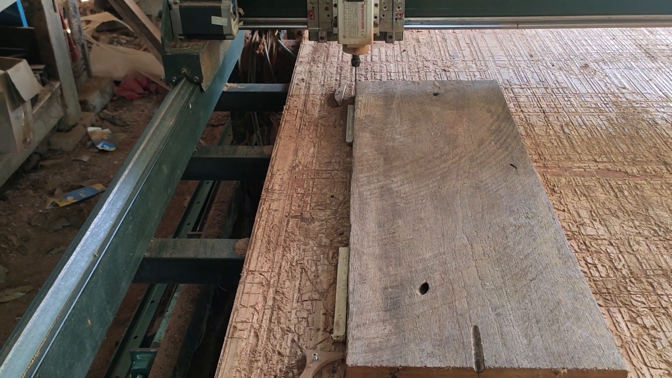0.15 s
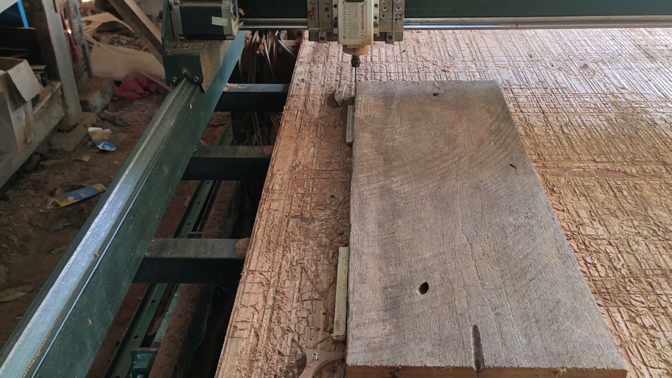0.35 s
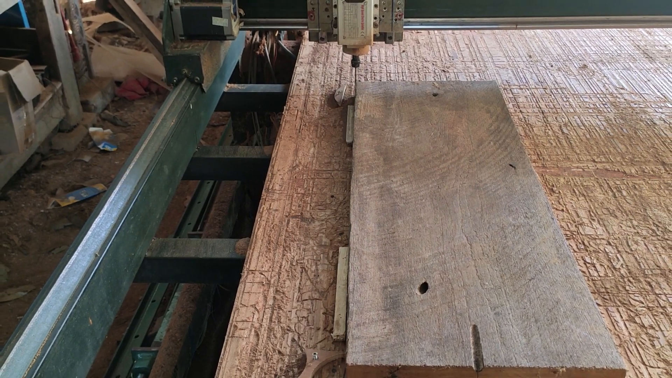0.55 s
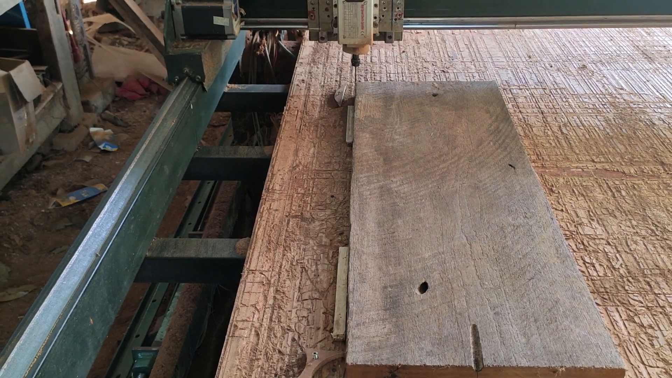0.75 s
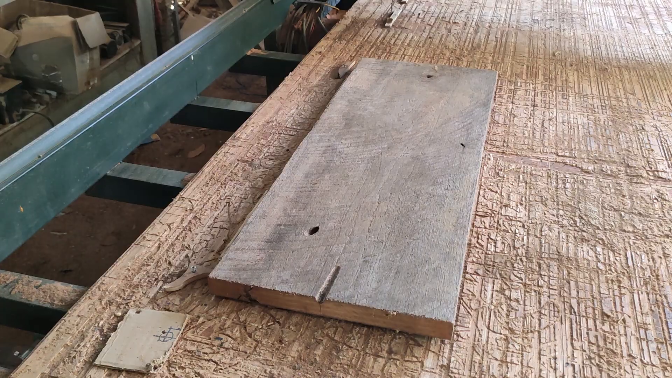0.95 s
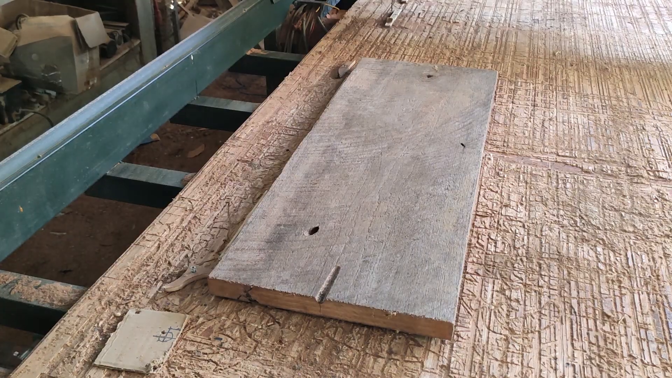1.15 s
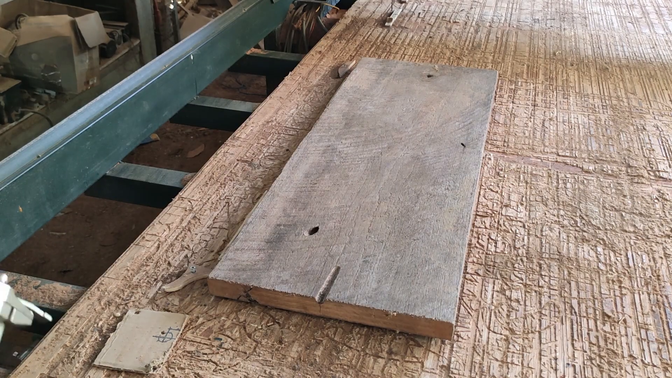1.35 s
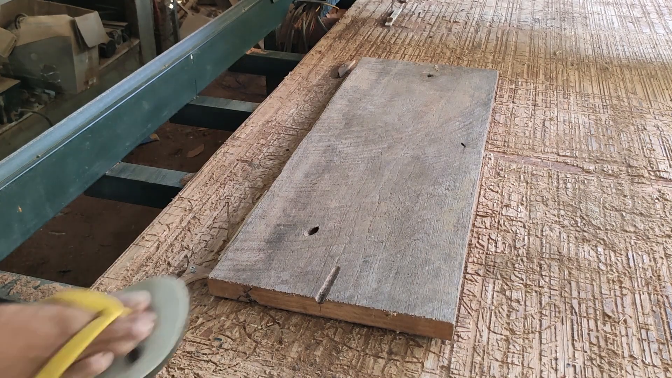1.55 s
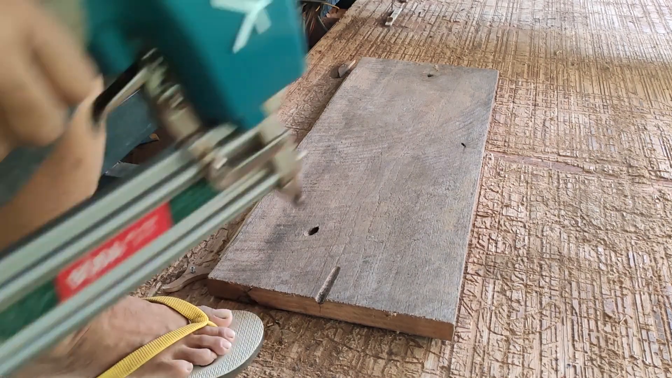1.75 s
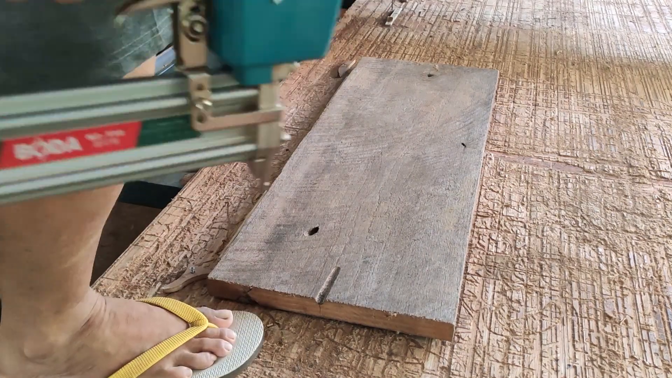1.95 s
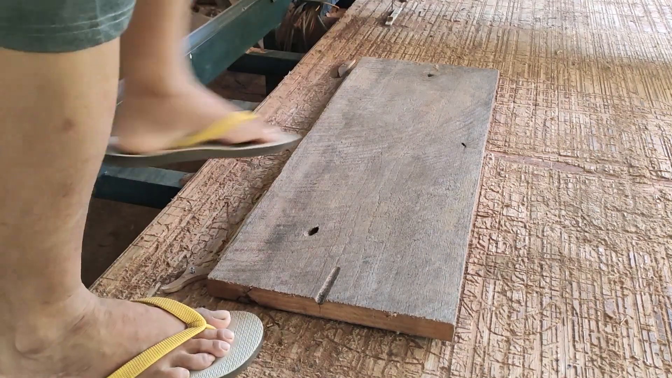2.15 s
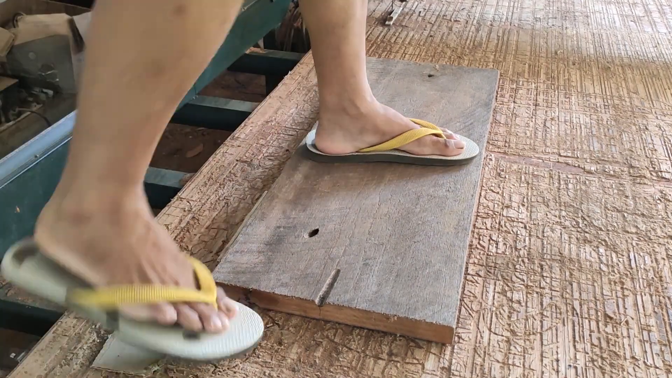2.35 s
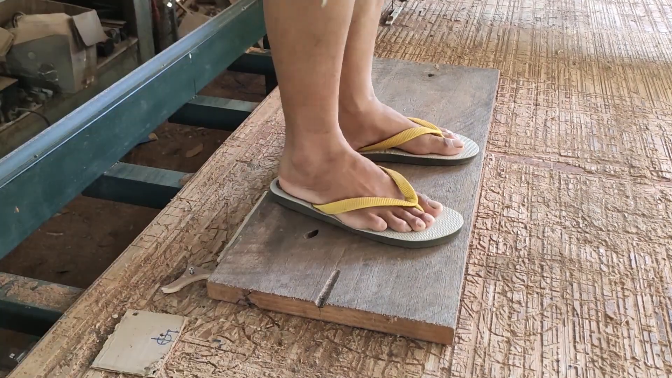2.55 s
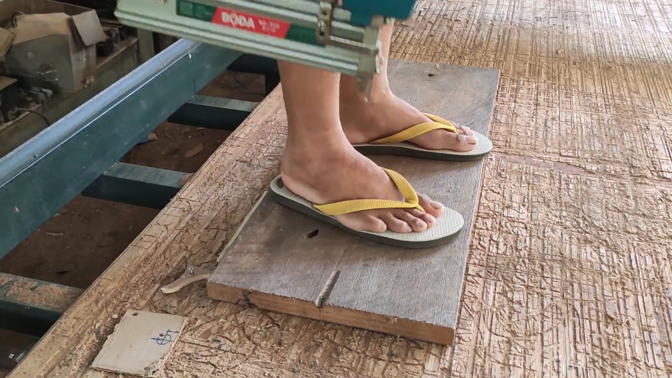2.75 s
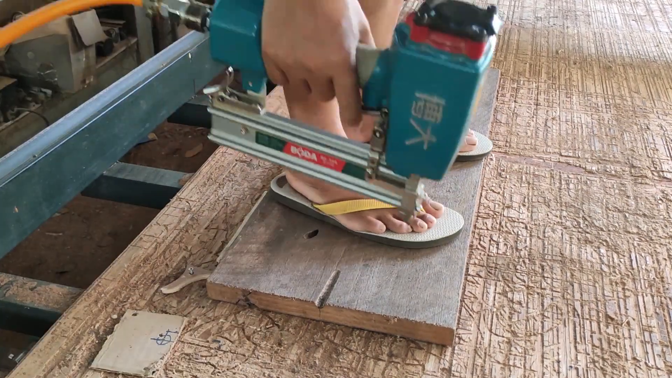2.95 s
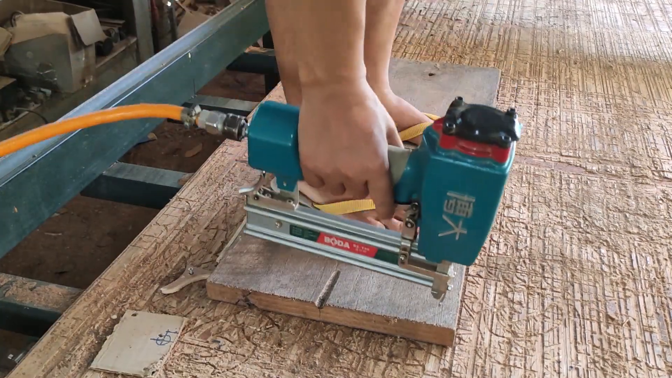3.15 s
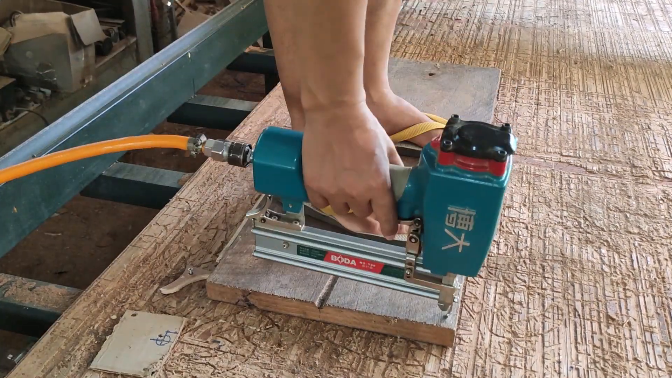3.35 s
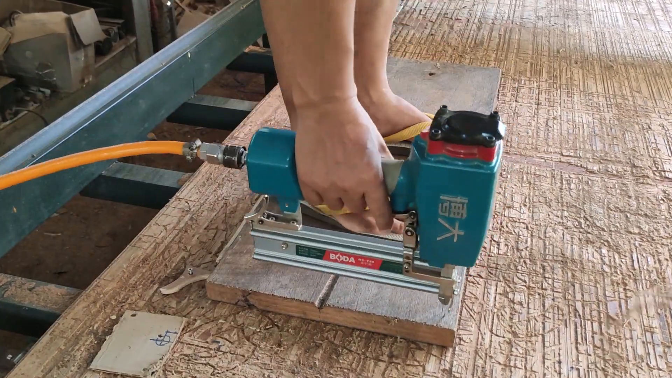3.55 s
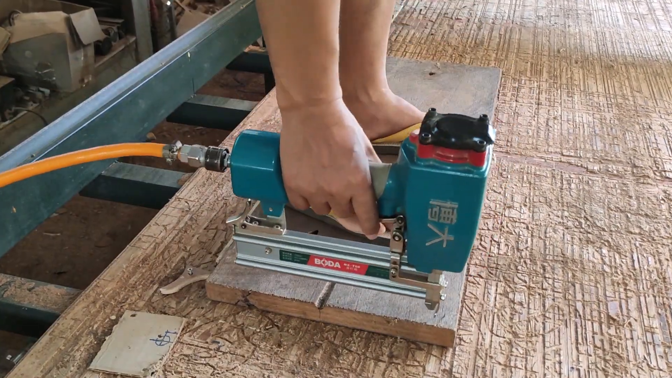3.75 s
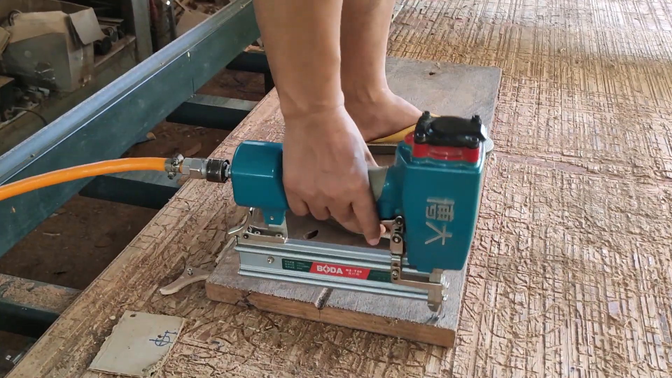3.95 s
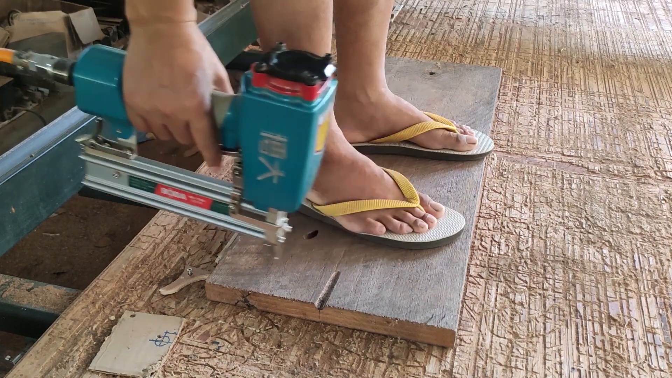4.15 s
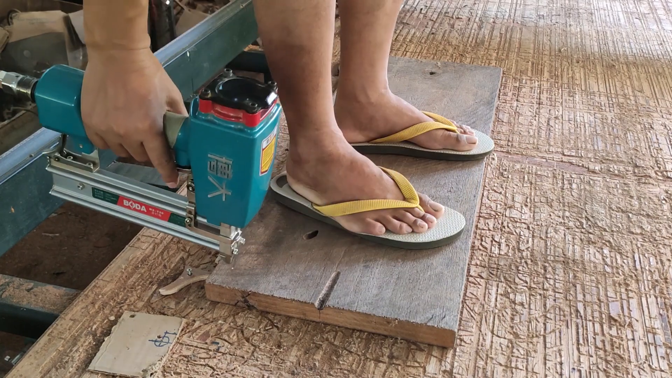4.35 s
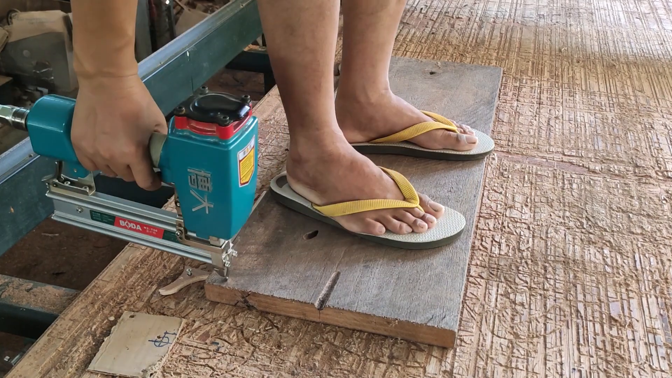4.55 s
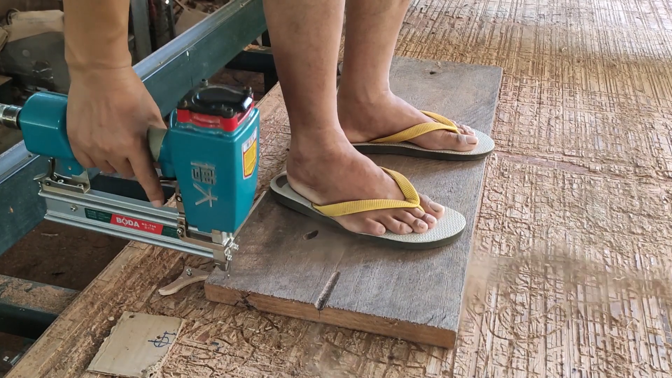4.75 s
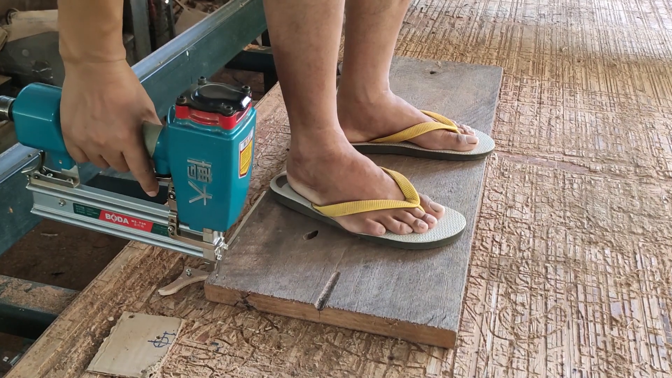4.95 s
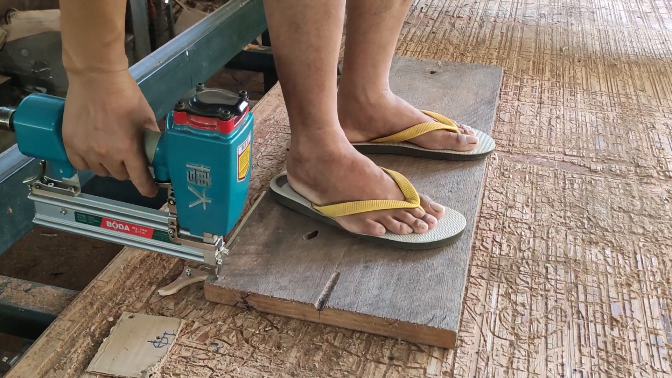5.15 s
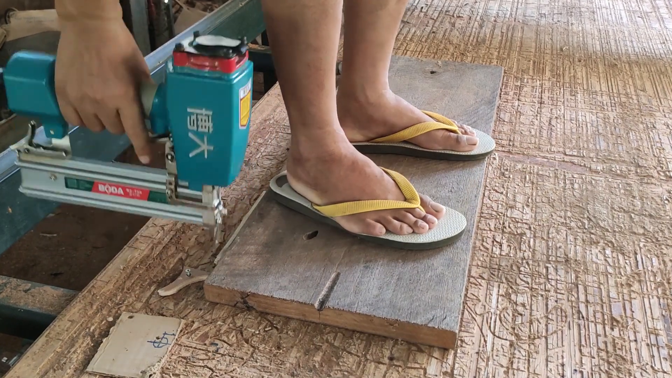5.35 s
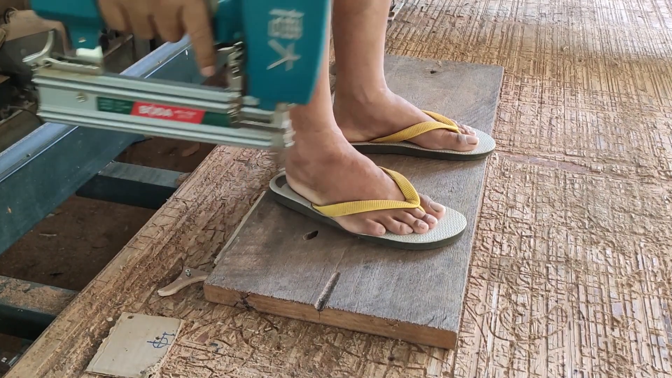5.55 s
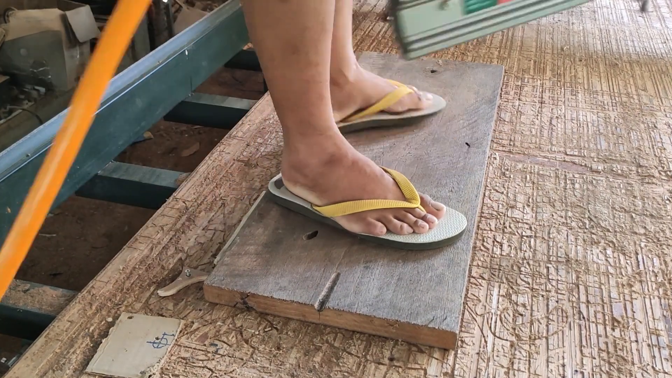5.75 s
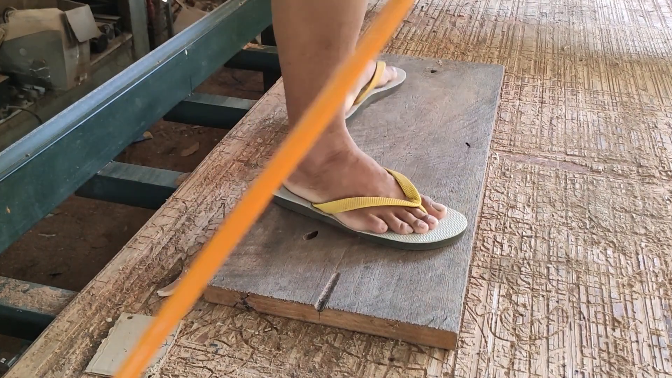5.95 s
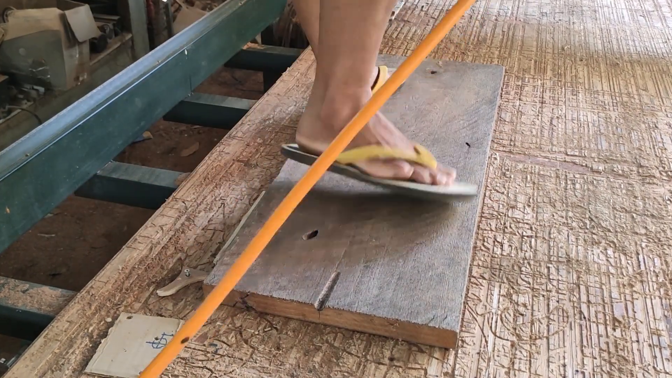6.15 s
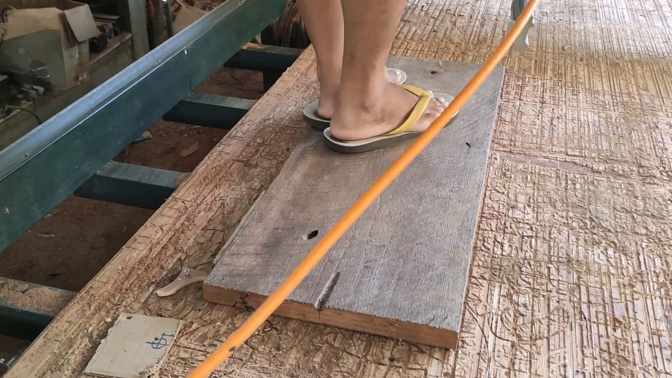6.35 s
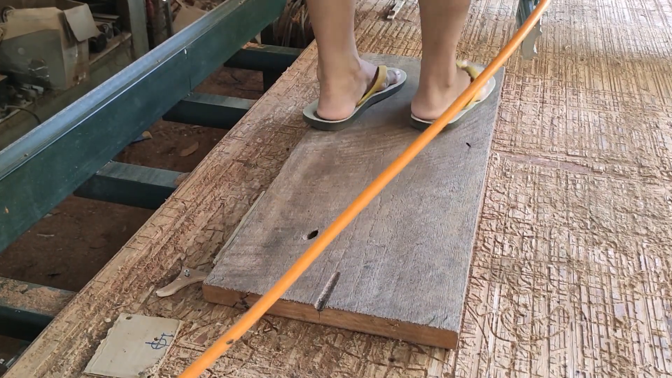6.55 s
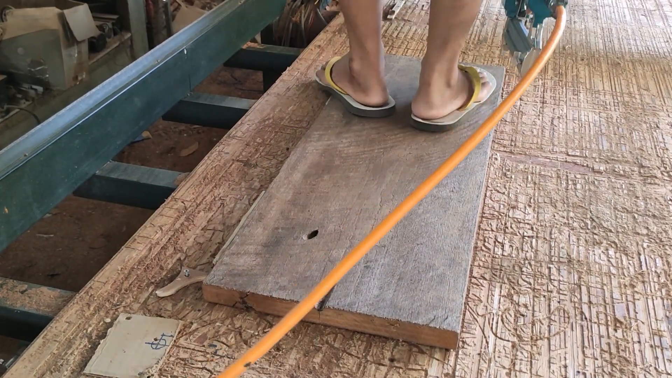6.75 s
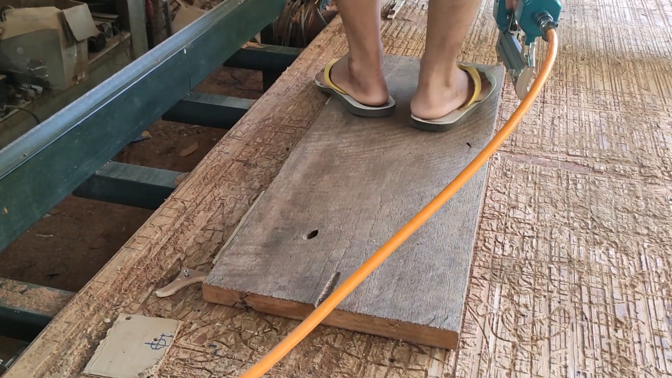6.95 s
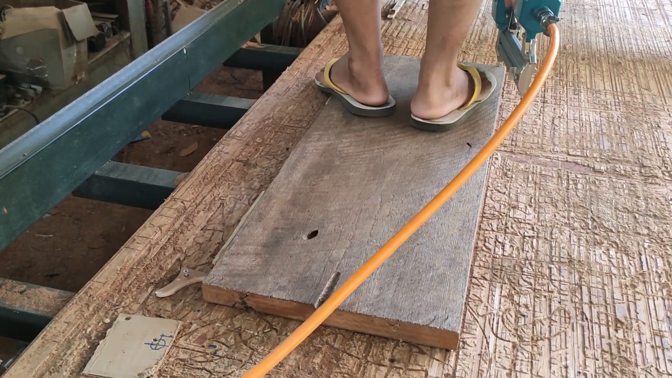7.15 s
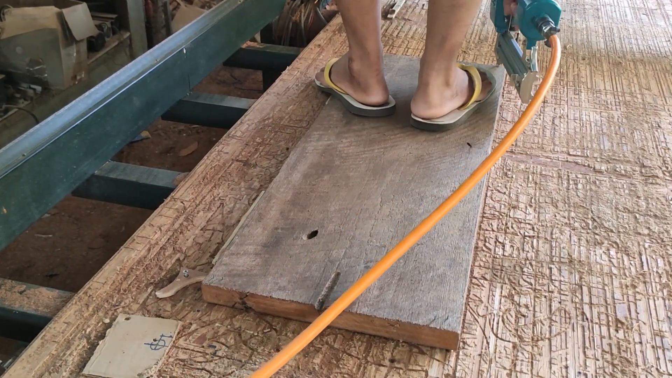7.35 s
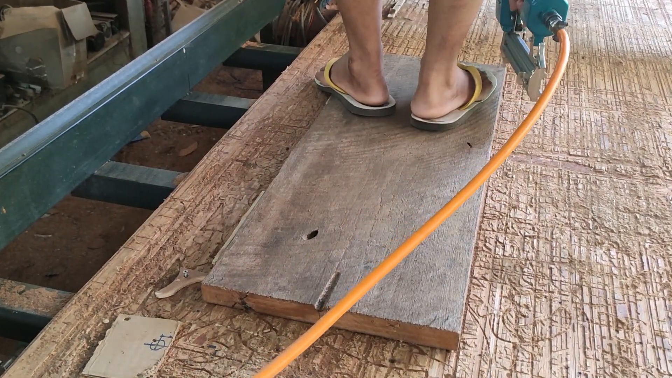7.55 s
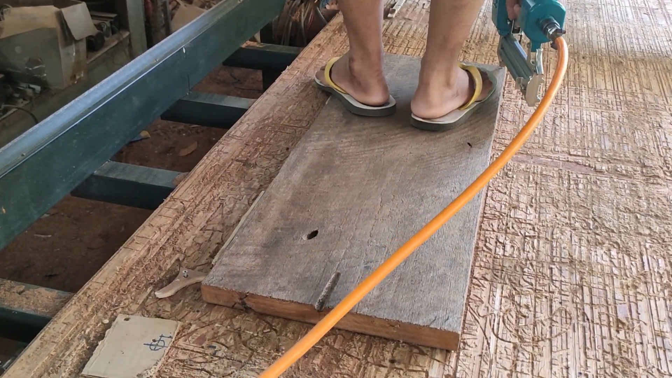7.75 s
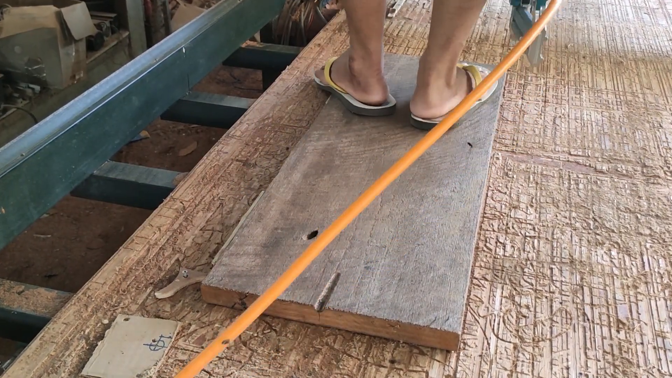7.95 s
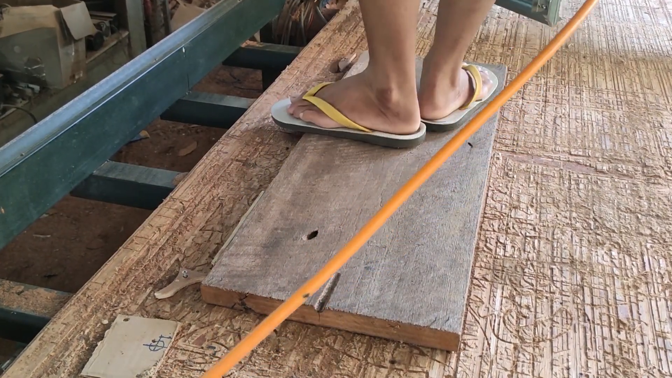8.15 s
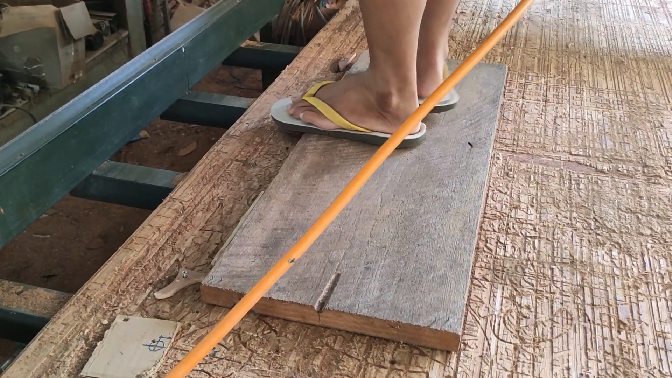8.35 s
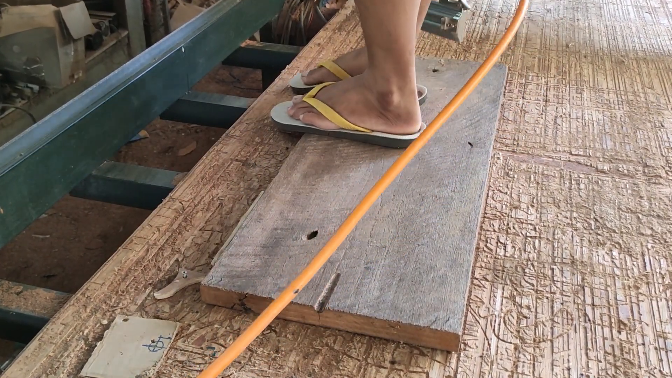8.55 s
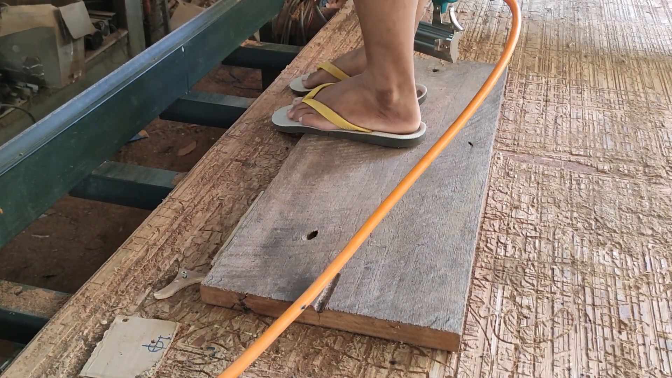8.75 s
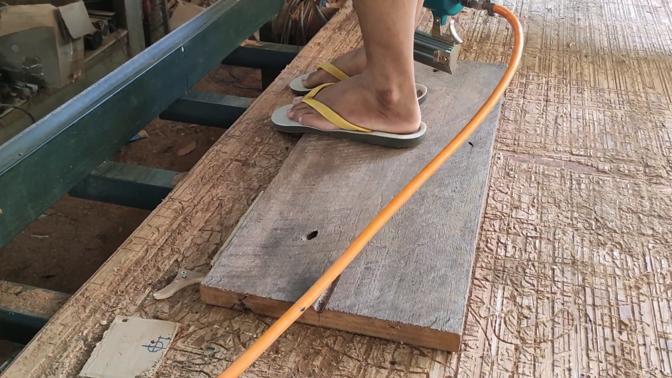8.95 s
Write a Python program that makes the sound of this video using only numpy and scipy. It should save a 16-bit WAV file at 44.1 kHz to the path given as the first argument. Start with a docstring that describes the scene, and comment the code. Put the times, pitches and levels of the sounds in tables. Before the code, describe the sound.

Quiet yard air with a faint falling whine and a dry trill of ticks cuts to a near machine, humming and knocking steadily. Sandals thud and slap onto a board. A nail gun fires four close, cracking shots with exhaust blasts, air buffeting the microphone. Feet scuff and squeak away, then two more shots strike farther along the board, and a last hiss begins. Open shed, close stereo microphone.

```python
"""Quiet yard sound comes first, with a faint falling whine and a dry trill of ticks: air noise, tones and short rings.
It gives way to a near machine that hums and knocks to the end: shaft multiples, motor tones and resonant noise.
Sandals thud, scuff and slap on a board: ringing wood modes, bursts of noise and sharp pressure swings.
A pneumatic nail gun drives six nails into it: valve hiss, driver blow and exhaust blast, all noise jets, cracks
and modes. Air from its blows and exhausts buffets the microphone, and the hiss of a seventh shot ends the scene."""
import sys
import numpy as np
from scipy import signal
from scipy.fft import rfft, irfft
from scipy.io import wavfile

SR = 44100
rng = np.random.default_rng(int(sys.argv[2]) if len(sys.argv) > 2 else 0)


def wav_record(signal):
    """Record a signal, one row per channel, as 16-bit PCM in the file named by sys.argv[1]."""
    frames = np.transpose(np.atleast_2d(signal))
    bounded = np.clip(frames, -1, 1)
    # unit amplitude maps onto the largest positive 16-bit level
    quanta = np.round(bounded * 32767).astype(np.int16)
    wavfile.write(sys.argv[1], SR, quanta)


N = 397782
T = np.arange(N) / SR
MACHINE_START_S = .835


def amp(db):
    """Decibels to gain."""
    return 10 ** (np.asarray(db) / 20)


def unit(x):
    """Scales to rms 1."""
    return x / np.sqrt(np.mean(x ** 2) + 1e-20)


def read(points, hz):
    """Reads a table along a log-frequency axis."""
    f, value = np.transpose(points)
    return np.interp(np.log(hz + 1), np.log(f + 1), value)


def add(mix, s, sound):
    """Adds a sound into the mix from time s, cut at the end of the scene."""
    part = mix[:, round(s * SR):][:, :sound.shape[-1]]
    part += sound[..., :part.shape[1]]


def drift(rate_hz):
    """Slow random wandering of rms 1, with little movement above rate_hz."""
    coarse = T[::32]
    hz = np.fft.rfftfreq(len(coarse), coarse[1])
    low_pass = 1 / (1 + (hz / rate_hz) ** 4)
    slow = irfft(rfft(rng.standard_normal(len(coarse))) * low_pass, len(coarse))
    return np.interp(T, coarse, unit(slow))


def noise(spectrum, alike, size):
    """Coloured noise of rms 1 at two microphone ports, as alike in each band as the table says."""
    hz = np.fft.rfftfreq(size, 1 / SR)
    a, b = rfft(rng.standard_normal((2, size)))
    same = np.clip(read(alike, hz), -1, 1)
    ports = np.array([a, same * a + np.sqrt(1 - same ** 2) * b])
    return unit(irfft(ports * amp(read(spectrum, hz)), size))


def narrow(hz, width_hz):
    """Turbulence in one resonance, at half gain width_hz to either side of its centre."""
    f = np.fft.rfftfreq(N, 1 / SR)
    resonance = 1 / (1 + ((f - hz) / width_hz) ** 2)
    return unit(irfft(rfft(rng.standard_normal((2, N))) * resonance, N))


def die_away(x, t60):
    """Lets every band decay at its own speed."""
    hz, t, z = signal.stft(x, SR, nperseg=128)
    decay = amp(-60 * t / read(t60, hz)[:, None])
    return signal.istft(z * decay, SR, nperseg=128)[1][:, :x.shape[1]]


def tones(table, waver=0.2):
    """Steady motor tones whose phase wavers (radians rms) at each port."""
    out = np.zeros((2, N))
    for hz, db in table:
        wander = waver * np.array([drift(2.5), drift(1.6)])
        out += amp(db) * np.sqrt(2) * np.sin(2 * np.pi * hz * T + wander)
    return out


# spectrum of the yard's air: f/Hz, level/dB per Hz (relative)
YARD_SPECTRUM = [(24, -43), (40, -23), (124, -26.5), (178, -16), (284, -16.5), (421, -13), (487, 1.5),
                 (758, -12), (899, -11.5), (992, -16.5), (1430, -20.5), (1830, -18), (2230, -22),
                 (5000, -26), (14000, -45)]
# left-right likeness of distant sound, also for the machine: f/Hz, likeness (0-1)
FAR_LIKENESS = [(60, 1), (290, 0.88), (640, 0.55), (1410, 0.41), (3100, 0.18), (16000, 0)]
# steady tones of far machinery: f/Hz, level/dB
FAR_TONES = [(183, -69), (366.1, -64.5), (489.9, -59), (899, -65)]


def yard():
    """Far machinery, a faint falling whine and a trill, before the near machine is heard."""
    swell_db = 2.7 * np.clip(T / .5, 0, 1) - 3.0
    air = amp(-50) * noise(YARD_SPECTRUM, FAR_LIKENESS, N) * amp(drift(3.3) + swell_db)
    fade_out = np.clip((MACHINE_START_S - .005 - T) / 0.014, 0, 1)
    return (air + tones(FAR_TONES) + whine() + trill()) * fade_out


# path of a faint far whine: t/s, f/Hz, level/dB
WHINE_PATH = [(.33, 1190, -83), (.39, 1160, -55), (.5, 1122, -50), (.58, 1124, -50), (.68, 1054, -69)]


def whine():
    """A falling tone with two overtones, unsteady in pitch and level."""
    s, hz, db = np.transpose(WHINE_PATH)
    pitch_hz = np.interp(T, s, hz) * (1 + 0.0063 * drift(60))
    phase = 2 * np.pi * np.cumsum(pitch_hz) / SR
    level_db = np.interp(T, s, db, -120, -120) + 2.7 * drift(37)
    second = 0.21 * np.sin(2 * phase + 0.77 * drift(120))
    third = 0.14 * np.sin(3 * phase + drift(120))
    return amp(level_db) * (np.sin(phase) + second + third)


# a dry trill of ticks: t/s, rate/ticks per s, level/dB
TRILL_PATH = [(.51, 35, -52), (.57, 55, -48), (0.608, 112, -45), (.66, 120, -45), (.73, 110, -45),
              (0.821, 127, -44)]
# each tick rings with: f/Hz, level/dB, decay time constant/s
TICK_RINGS = [(5670, -1, 0.0012), (6300, 3, 0.00054), (8760, -9, 0.00061), (11600, -9, 0.00062)]


def trill():
    """Thin ticks that speed up to a nearly even train, each a few short high rings."""
    s, rate, db = np.transpose(TRILL_PATH)
    count = np.floor(np.cumsum(np.interp(T, s, rate, 0, 0)) / SR + .5)
    ticks = np.diff(count, prepend=0) * amp(np.interp(T, s, db) + 1.6 * rng.standard_normal(N))
    t = T[:400]
    ring = sum(amp(db) * np.exp(-t / decay) * np.sin(2 * np.pi * hz * t) for hz, db, decay in TICK_RINGS)
    ring = ring * np.minimum(t / 0.00047, 1)
    return signal.oaconvolve(ticks, ring)[:N]


# spectrum of the machine's rush of air: f/Hz, level/dB per Hz (relative)
RUSH_SPECTRUM = [(20, -15), (60, -32), (150, -9.5), (300, -11), (550, -7.5), (800, -6.5), (1010, 10.5),
                 (1200, 1.5), (1450, -0.5), (1900, 6), (2600, -10), (5000, -11), (11500, -14),
                 (13200, -10.5), (16000, -32)]
# resonances in that rush: f/Hz, half-width/Hz, level/dB
AIR_WHISTLES = [(1017, 32, -61.5), (3003, 23, -59.5), (3670, 30, -60.5), (8340, 490, -58)]
# other motors: f/Hz, level/dB
MOTOR_TONES = [(91.5, -64), (237, -71.5), (280, -72), (327, -63.5), (489.9, -65.5), (1814, -58),
               (8460, -84)]
MACHINE_FADE_S, PORT_LAG_SAMPLES = 0.096, 8  # the machine reaches the left port later


def machine():
    """The knocking shaft, other motors and whistling air, all a little to the right."""
    rush = amp(-45.5) * noise(RUSH_SPECTRUM, FAR_LIKENESS, N) * amp(.5 * drift(1.1))
    for hz, width, db in AIR_WHISTLES:
        rush += amp(db + 0.72 * drift(17)) * narrow(hz, width)
    left, right = knocking() + rush + tones(MOTOR_TONES)
    fade_in = np.clip((T - MACHINE_START_S) / MACHINE_FADE_S, 0, 1)
    return np.array([np.roll(left, PORT_LAG_SAMPLES), right]) * fade_in


# machine shaft: t/s, speed/turns per s
SHAFT_SPEED = [(0, 46.9), (1.5, 46.92), (3.4, 46.97), (5.6, 47.05), (6.3, 47.08), (9.02, 47.05)]
# buzz of the machine's casing: f/Hz, level/dB per Hz (relative)
BUZZ_SPECTRUM = [(40, -5), (500, -28), (1300, -18), (2300, 10), (2700, 3), (3200, -1), (3900, 0),
                 (6000, -8.5), (9000, -2), (16000, -3)]


def knocking():
    """Two light knocks and a hard one in every turn of the shaft make a comb of lines that throbs."""
    light, spacing_turns = .6, .255  # a light knock's strength against the hard one, and the gap
    scatter, waver_db = .22, 1.1  # phase scatter in radians
    speed = np.interp(T, *np.transpose(SHAFT_SPEED))
    turns = np.cumsum(speed * (1 + .0003 * drift(3))) / SR
    angle = 2 * np.pi * np.arange(2048) / 2048
    groups = np.zeros((5, 2, 2048))
    for k in range(7, 67):  # multiples of the shaft speed
        early = np.exp(2j * np.pi * k * spacing_turns)
        # the knocks stay crisp where the casing rings; reflections smear the other lines
        smear = scatter * (1 + ((k - 42) / 7) ** 2)
        phase = np.angle(1 + light * (early + early ** 2))
        phase = phase + smear * rng.standard_normal() + scatter * rng.standard_normal((2, 1))
        groups[k % len(groups)] += casing_gain(k, speed.mean()) * np.cos(k * angle + phase)
    # each group of lines swells and sinks on its own
    hum = sum(amp(waver_db * drift(10.0)) * each_turn(lines, turns) for lines in groups)
    # the casing buzzes with the same faint pattern on every turn
    buzz = each_turn(noise(BUZZ_SPECTRUM, FAR_LIKENESS, size=937), turns)
    return amp(3.5) * hum + amp(-49.0) * buzz


# resonances of the machine's casing, rung by the knocks: f/Hz, half-width/Hz, level/dB (relative)
CASING_MODES = [(446, 90, -59), (705, 29, -57.5), (1313, 30, -52), (1645, 22, -56), (1824, 25, -50.5),
                (1950, 220, -53.5), (2000, 96, -53), (2210, 28, -55.5), (3020, 34, -59)]


def casing_gain(k, shaft_hz):
    """Strength of the k-th multiple of the shaft speed, as the casing passes it; even ones are weaker."""
    hz, width, db = np.transpose(CASING_MODES)
    passed = amp(db) / (1 + ((k * shaft_hz - hz) / width) ** 2)
    return np.linalg.norm(passed) * amp(-4.5 * (k % 2 == 0))


def each_turn(shape, turns):
    """Repeats a two-port pattern once in every turn of the shaft."""
    return np.array([np.interp(turns, np.arange(len(p)) / len(p), p, period=1) for p in shape])


# sandals set down on the board: t/s, thud level/dB, scuff level/dB
FOOTSTEPS = [(1.727, -45, -63), (2.076, -66, -39.5), (2.299, -27, -39), (2.54, -44, -44), (2.759, -23, -50),
             (6.058, -45, -49), (6.601, -40, -47), (6.798, -42, -52), (6.91, -39, -48), (8.87, -44, -47.5)]
# a sole slapping down flat: t/s, slap level/dB, level of the knock in the board/dB
SOLE_SLAPS = [(2.3091, -9.5, -34), (2.541, -28, -58), (6.607, -24, -40), (6.797, -33, -50),
              (6.915, -27, -47)]
# dull answer to a foot: f/Hz, level/dB per Hz (relative)
THUMP_SPECTRUM = [(30, -50), (90, 2), (170, 1.5), (300, 12.5), (600, 7.5), (2000, -41), (16000, -80)]
# sole dragged over wood: f/Hz, level/dB per Hz (relative)
SCUFF_SPECTRUM = [(200, -39), (900, -5), (1450, 8), (2600, 3.5), (4000, -0.5), (6300, -1.5), (8000, -8),
                  (16000, -18)]
# a firm step's scuff; a lighter foot drags for longer
SCUFF_S, FIRM_STEP_DB, DRAG_DOUBLES_DB = 0.0098, -25, 18.5


def sandals():
    """A sole thuds on the board, scuffs the wood and may slap down flat; once it squeaks as it turns."""
    out = np.zeros((2, N))
    for s, thud_db, scuff_db in FOOTSTEPS:
        length = SCUFF_S * 2 ** ((FIRM_STEP_DB - thud_db) / DRAG_DOUBLES_DB)
        thump = amp(-11.5) * jet(THUMP_SPECTRUM, rise=0.0048, hold=0.014, t60=0.19)
        add(out, s, amp(thud_db) * (board(soft_hz=605) + thump))
        add(out, s, amp(scuff_db) * jet(SCUFF_SPECTRUM, length / 2, length, t60=0.16))
    for s, slap_db, knock_db in SOLE_SLAPS:
        add(out, s, amp(slap_db) * crack(hz=1780, width=0.00035))
        add(out, s, amp(knock_db) * board(soft_hz=2400))
    squeak = np.interp(T, [6.06, 6.075, 6.15], [0, 1, 0])
    return out + amp(-49) * squeak * narrow(hz=4240, width_hz=39)


# modes of the board with a nail driven in: f/Hz, level/dB, t60/s
BOARD_MODES = [(294, -18, 0.12), (406, -5, 0.11), (472, -17, 0.26), (588, -11.5, 0.16), (672, -7, 0.082),
               (811, 2.5, 0.041), (1027, 4.5, 0.03), (1194, 3.5, 0.046), (1758, -4, 0.067),
               (2373, -3, 0.11), (2850, -6.5, 0.14), (3145, 2, 0.049)]


def board(soft_hz, size=12000):
    """The board's ringing modes; a soft blow excites mostly those under soft_hz."""
    t = T[:size]
    hz, db, t60 = np.transpose(BOARD_MODES)[..., None]
    phase = rng.uniform(0, 2 * np.pi, hz.shape) + rng.standard_normal((2, len(hz), 1)) * hz / 1800
    softness = 1 / (1 + (hz / soft_hz) ** 4)
    modes = amp(db - 60 * t / t60) * softness * np.sin(2 * np.pi * hz * t + phase)
    return modes.sum(1) * np.minimum(t / 0.00089, 1)


# left-right likeness of near sound: f/Hz, likeness (0-1)
NEAR_LIKENESS = [(60, 0.65), (400, 0.99), (1400, 0.54), (3000, 0.38), (7000, 0.042), (16000, 0.053)]
# jets lean slightly right in the lows and left in the highest treble: f/Hz, left minus right level/dB
JET_TILT = [(200, -2.5), (4400, -0.5), (8000, -1), (13000, 4), (16000, 0)]


def jet(spectrum, rise, hold, t60, size=12000):
    """A burst of air: it opens, holds, and dies away among near surfaces (times in s)."""
    t = T[:size]
    side_db = read(JET_TILT, np.fft.rfftfreq(size, 1 / SR))
    port_gains = amp(np.array([side_db, -side_db]) / 2)
    air = irfft(rfft(noise(spectrum, NEAR_LIKENESS, size)) * port_gains, size)
    return air * np.minimum(t / rise, 1) * amp(-60 * np.maximum(t - hold, 0) / t60)


def crack(hz, width, size=600):
    """One sharp pressure swing, a cycle or two long, from a source too small to radiate bass."""
    t = T[:size] - 2 * width
    swing = np.cos(2 * np.pi * hz * t) * np.exp(-abs(t / width) ** 1.14)
    return signal.sosfilt(signal.butter(2, 200, "high", fs=SR, output="sos"), swing)


# air through the trigger valve, also colours the nose's click: f/Hz, level/dB per Hz (relative)
VALVE_SPECTRUM = [(240, -41), (400, -8.5), (1330, -13.5), (1560, -9), (1840, -17), (2430, -12),
                  (3810, -7.5), (4110, -8), (7280, -2), (10700, -3), (12900, 2.5), (15000, -1),
                  (16000, -27)]


def nose_tap(click_db, ring_db):
    """The steel nose touches the board: a tiny burst of noise and a soft ring of the wood."""
    click = jet(VALVE_SPECTRUM, rise=0.0011, hold=0.0021, t60=0.059)
    return amp(click_db) * click + amp(ring_db) * board(soft_hz=900)


# the gun's nose set on the board: t/s, click level/dB, board ring level/dB
NOSE_CLICKS = [(3.345, -38, -57), (3.849, -31.5, -43), (4.51, -35.5, -41), (4.599, -40, -31),
               (5.043, -42.5, -55)]
# one row a shot: blow t/s, crack level/dB, board ring level/dB, puff of air level/dB, valve hisses before/s,
# valve level/dB, exhaust follows after/s, exhaust level/dB, place (0 near end - 1 far end)
GUN_SHOTS = [(3.5231, -6, -32, -29, .0322, -8.5, .0531, -15.3, .1),
             (3.9495, -5.5, -41, -44, .0358, -8, .047, -16.5, 0),
             (4.6993, -2.5, -25.5, -20.5, .1006, -11.5, .0838, -19.5, 0),
             (5.2597, -6.5, -23.5, -26, .0301, -14.5, .0718, -18, 0),
             (7.340, -11.5, -18.5, -56, .031, -20.5, .0672, -14.5, .92),
             (7.807, -10, -16, -56, .0325, -21.5, .0724, -14.2, 1),
             (9.055, -10, -18, -56, .099, -19.5, .07, -14.5, 1)]
# the gun at the near and the far end of the board: span the valve hiss sinks through/dB, crack f/Hz,
# clatter level/dB, bounce click over the board's ring/dB, exhaust rise/s, exhaust hold/s,
# piston return thud level/dB, thud hold/s
GUN_ENDS = [(-12, 1900, -16.5, -2.5, 0.0018, 0.007, -15, .0065),
            (-8, 1260, -9.3, -14, 0.0069, 0.018, -23, .011)]
# loose rattle of the blow: f/Hz, level/dB per Hz (relative)
CLATTER_SPECTRUM = [(88, -38), (150, -33), (368, -11.5), (689, 1), (854, -8), (1170, -6.5), (1600, -2),
                    (1900, -1.5), (2220, -5), (3040, -2), (3840, -7), (12700, -9.5), (16000, -14)]
# decay of that rattle: f/Hz, t60/s
CLATTER_DECAY = [(200, 0.11), (600, 0.12), (2000, 0.076), (6000, 0.078), (15000, 0.06)]
# exhaust blast: f/Hz, level/dB per Hz (relative)
EXHAUST_SPECTRUM = [(200, -47), (700, -0.5), (2000, 2.5), (4400, 4.5), (6000, 3), (7000, 2), (9500, 4.5),
                    (13500, 8), (16000, 0)]
# piston rushing down or back: f/Hz, level/dB per Hz (relative)
PISTON_SPECTRUM = [(20, -24), (120, -4), (280, -6), (600, 0), (1300, 2), (2600, -1.5), (4500, -3),
                   (8000, -7), (16000, -38)]
VALVE_SHUTS_S = .007  # the leak starts to die this long before the blow
BOUNCE_LEAD_S = .016  # the recoiling nose lands again this long before the exhaust
BOUNCE_RING_DB = -9  # relative to the board's ring at the blow


def nail_gun():
    """Valve hiss, driver blow into the board, a bounce, then exhaust as the piston flies back."""
    out = np.zeros((2, N))
    near, far = np.array(GUN_ENDS)
    for blow, crack_db, ring_db, _, valve_lead, valve_db, exhaust_delay, hiss_db, place in GUN_SHOTS:
        trigger, exhaust = blow - valve_lead, blow + exhaust_delay
        gun = near + (far - near) * np.clip(place, 0, 1)
        sink_db, crack_hz, clatter_db, bounce_db, rise, hold, thud_db, thud_hold = gun
        air = jet(VALVE_SPECTRUM, rise=0.001, hold=valve_lead - VALVE_SHUTS_S, t60=0.033)
        # the hiss opens half a span down and sinks toward one and a half
        sinking_db = sink_db * (1.5 - np.exp(-T[:air.shape[1]] / 0.022))
        add(out, trigger, air * amp(valve_db + sinking_db))
        # the piston rushes down for a few milliseconds before the nail lands
        downstroke = jet(PISTON_SPECTRUM, rise=0.0048, hold=0.0031, t60=0.0073)
        add(out, blow - .004, amp(clatter_db - 19) * downstroke)
        add(out, blow, amp(crack_db) * crack(crack_hz, width=0.617 / crack_hz))
        clatter = die_away(noise(CLATTER_SPECTRUM, NEAR_LIKENESS, size=12000), CLATTER_DECAY)
        add(out, blow, amp(clatter_db) * clatter * np.minimum(T[:clatter.shape[1]] / 0.00051, 1))
        add(out, blow, amp(ring_db) * board(soft_hz=5000))
        add(out, exhaust - BOUNCE_LEAD_S, nose_tap(ring_db + bounce_db, ring_db + BOUNCE_RING_DB))
        add(out, exhaust, amp(hiss_db) * jet(EXHAUST_SPECTRUM, rise, hold, t60=0.072))
        add(out, exhaust + 0.000982, amp(thud_db) * jet(PISTON_SPECTRUM, rise, thud_hold, t60=0.042))
    for s, click_db, ring_db in NOSE_CLICKS:
        add(out, s, nose_tap(click_db, ring_db))
    return out


# eddies in a gust: f/Hz, level/dB per Hz (relative)
EDDY_SPECTRUM = [(20, 14), (80, -3), (150, -12.5), (280, -2.5), (500, -28), (2000, -60), (16000, -90)]


def buffets(eddy_gap_s=0.01033, size=20000):
    """Air pressure builds on the ports in steps as eddies land, then leaks away."""
    out, lead = np.zeros((2, N)), .06
    t = T[:size] - lead
    for s, left, right, build, fall in air_pushes():
        gap = eddy_gap_s * rng.uniform(0.95, 1.11)
        landed = np.floor(t / gap) * gap
        push = np.where(t < 0, np.exp(np.minimum(landed, 0) / build), np.exp(-abs(t) / fall))
        pressure = np.array([[left], [right]]) * push
        rumble = amp(-35.0) * np.sqrt(abs(pressure)) * noise(EDDY_SPECTRUM, NEAR_LIKENESS, size)
        add(out, s - lead, pressure + rumble)
    out = signal.sosfilt(signal.butter(2, 480, fs=SR, output="sos"), out)
    return signal.sosfilt(signal.butter(1, 1.8, "high", fs=SR, output="sos"), out)


# air from the gun's blows and exhausts buffeting the microphone, before smoothing:
# t/s, left pressure (full scale 1), right pressure (full scale 1), fall time constant/s
AIR_GUSTS = [(3.578, 0.046, -0.21, 0.025), (3.647, -0.22, .36, 0.031), (3.998, -0.04, -0.1, 0.0038),
             (4.07, 0.015, 0.033, 0.13), (4.76, -0.38, -0.18, 0.045), (4.844, 0.58, 0.46, .026),
             (5.321, 0.042, 0.14, 0.057), (5.396, -0.29, -0.48, 0.027)]
PUFF_BUILD_S, PUFF_FALL_S = 0.0025, 0.0092  # the puff that leaves the nose with each blow
GUST_SPREAD = 0.17  # seconds of build-up gained per second since the latest blow or exhaust


def air_pushes():
    """A sharp puff at each blow, and gusts softer-edged with travel: (s, left, right, build s, fall s)."""
    blows, _, _, puffs_db, _, _, exhaust_delays, _, _ = np.transpose(GUN_SHOTS)
    releases = np.concatenate([blows, blows + exhaust_delays])
    pushes = [(s, amp(db), amp(db), PUFF_BUILD_S, PUFF_FALL_S) for s, db in zip(blows, puffs_db)]
    for s, left, right, fall in AIR_GUSTS:
        travelled = abs(s - releases[releases < s + PUFF_BUILD_S].max())
        pushes.append((s, left, right, PUFF_BUILD_S + GUST_SPREAD * travelled, fall))
    return pushes


# decay of the open shed: f/Hz, t60/s
ROOM_DECAY = [(200, 0.17), (1500, 0.091), (6000, 0.59), (15000, 0.52)]


def room(x):
    """The short tail of an open shed: decaying noise that fades in, convolved with the sound."""
    tail = die_away(rng.standard_normal((2, 16000)), ROOM_DECAY)
    tail *= np.clip(T[:tail.shape[1]] / 0.037, 0, 1)
    return signal.fftconvolve(x, tail / np.linalg.norm(tail[0]), axes=1)[:, :N]


def scene():
    """Gun and feet in the shed, with the yard, then the machine behind, and gusts on the microphone."""
    near = nail_gun() + sandals()
    return near + amp(-21.5) * room(near) + machine() + yard() + buffets()


def record(dry, threshold_db=-19, squeeze=0.037, recovery_db_per_s=110):
    """A gentle limiter ducks everything in and after loud blasts; then the treble is cut at 16.1 kHz."""
    power = signal.lfilter([1 / 300], [1, 1 / 300 - 1], (dry ** 2).mean(0))
    # the sensed level jumps up with the power and falls back at the recovery rate
    fall = T * recovery_db_per_s
    level_db = np.maximum.accumulate(10 * np.log10(power + 1e-12) + fall) - fall
    over_db = np.maximum(level_db - threshold_db, 0)
    ducked = dry * amp(-squeeze * over_db)  # squeeze is dB of cut per dB over
    low_pass = signal.firwin(401, 16100, window=("kaiser", 8), fs=SR)
    return signal.oaconvolve(ducked, low_pass[None], "same", axes=1).clip(-1, 1)


dry = scene()
out = record(dry)
wav_record(out)
```